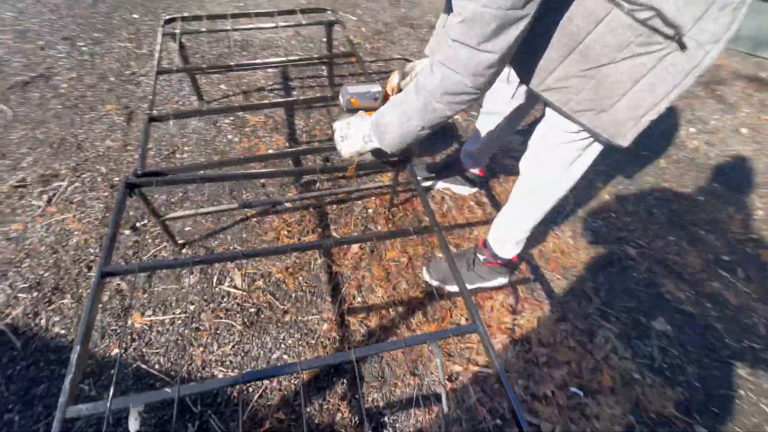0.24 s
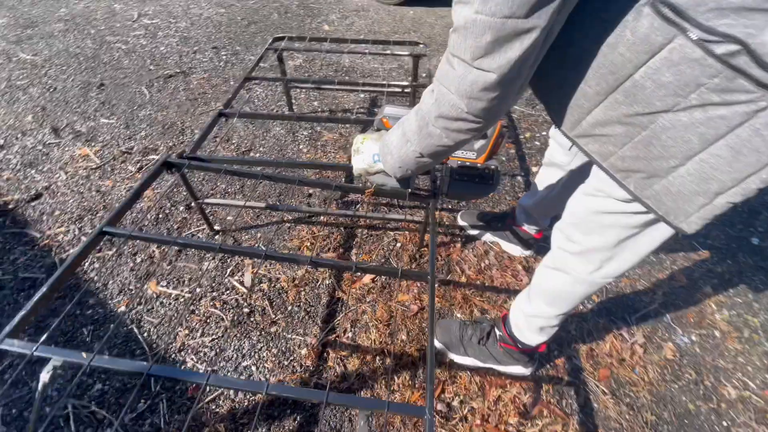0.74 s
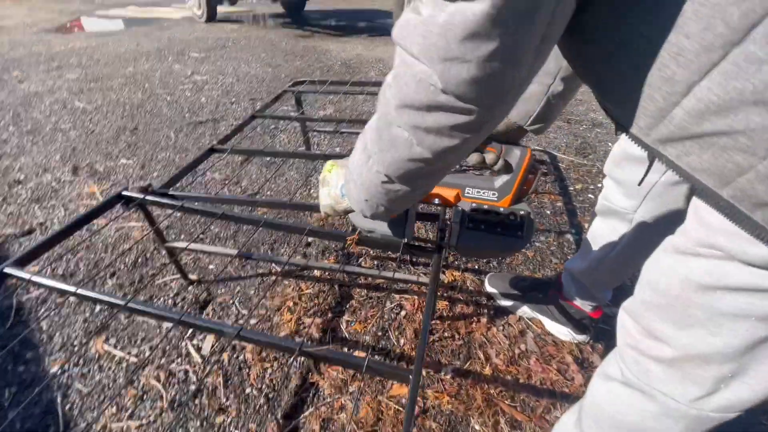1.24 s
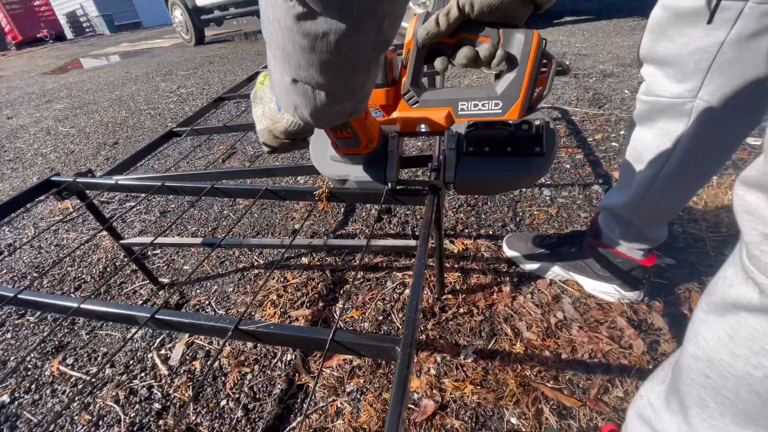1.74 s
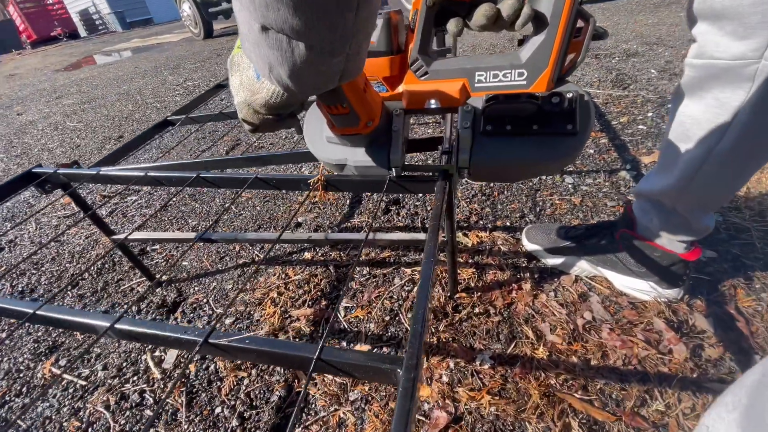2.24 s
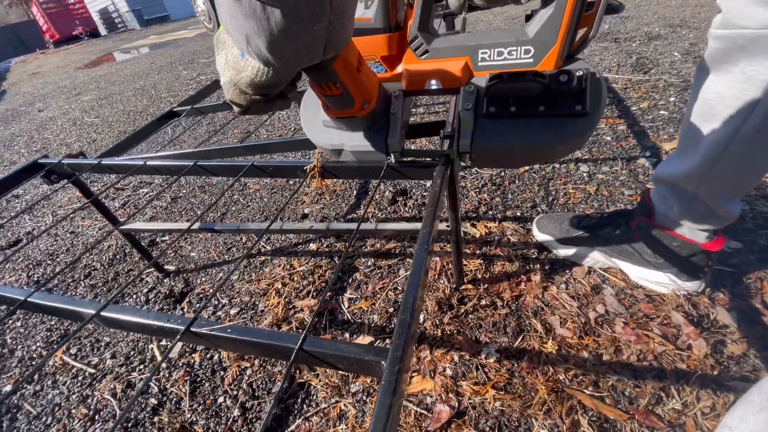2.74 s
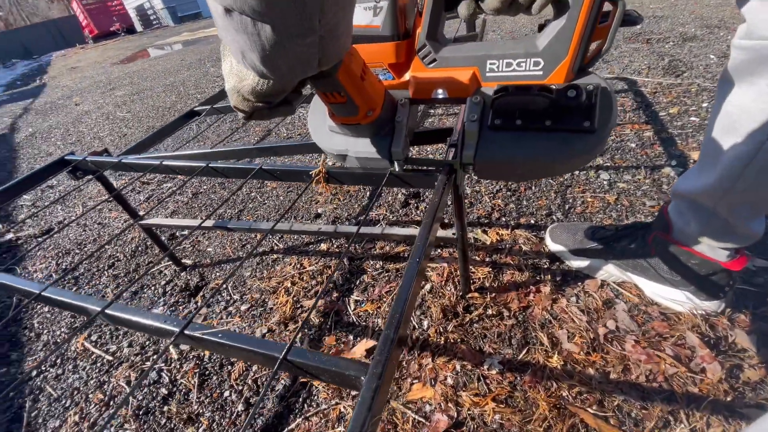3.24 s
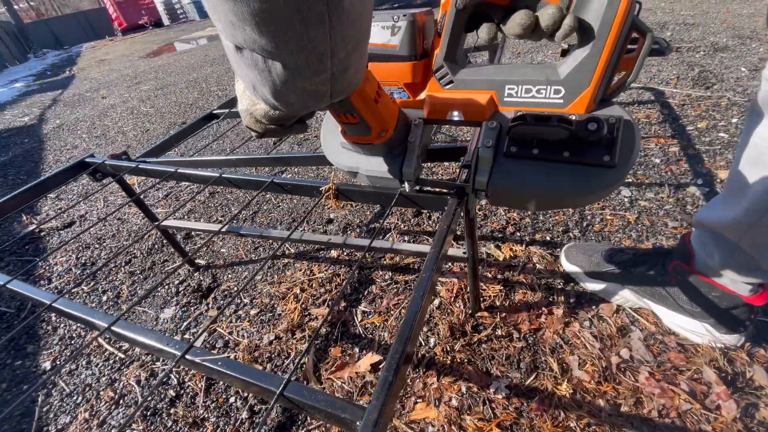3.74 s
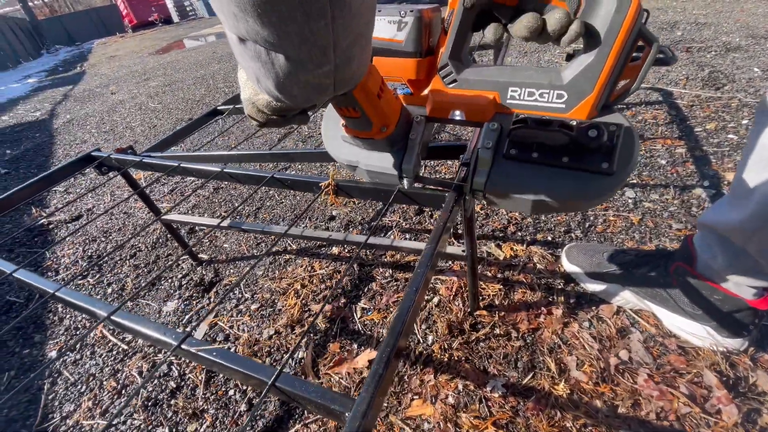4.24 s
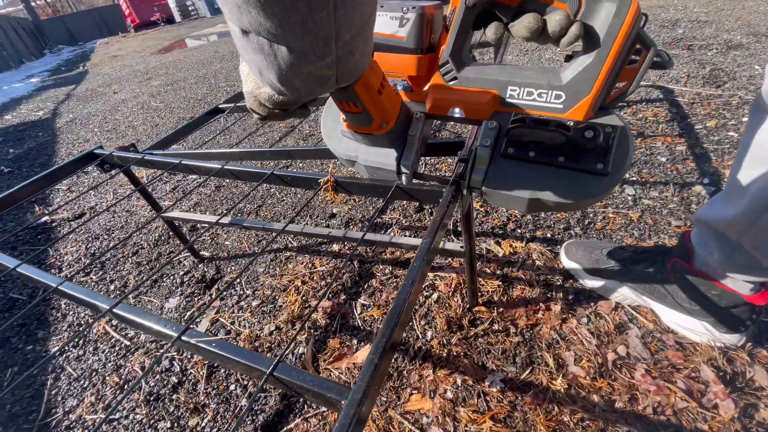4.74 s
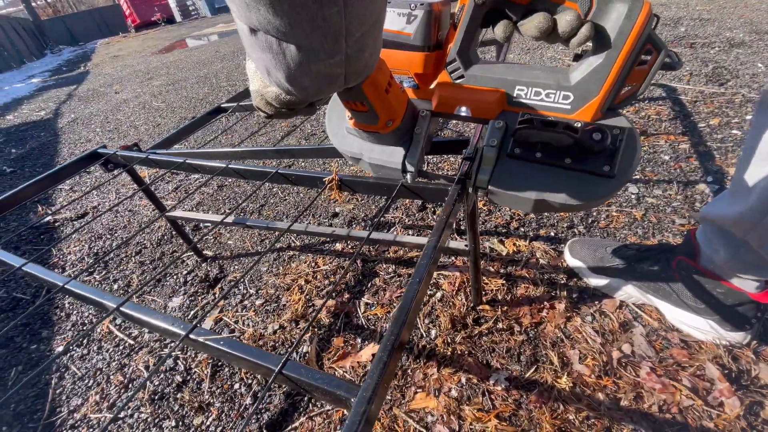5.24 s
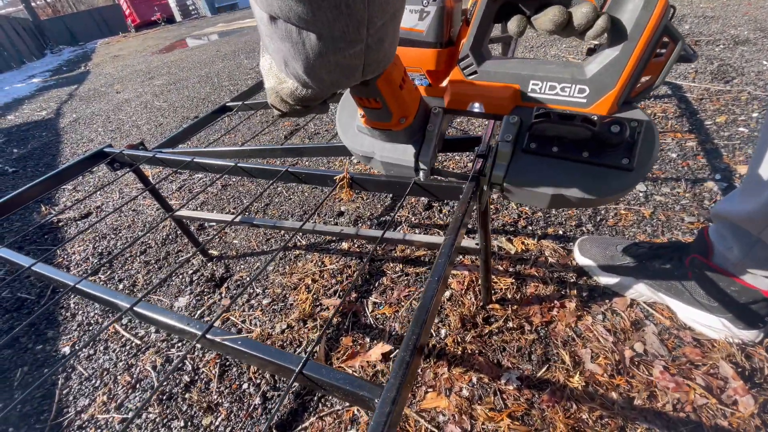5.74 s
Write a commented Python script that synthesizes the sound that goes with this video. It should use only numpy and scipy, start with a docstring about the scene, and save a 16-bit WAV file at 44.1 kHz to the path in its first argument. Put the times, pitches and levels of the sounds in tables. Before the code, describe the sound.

Outdoors on gravel, a handheld bandsaw cuts a steel bed rail. Wind buffets the microphone at first over rattling gears, a groan and piercing squeals. The cut thins after a second while a low motor tone swells, then the teeth bite hard into a bright, ringing hiss. A scrape pulses almost four times a second, and the cut weakens at the end.

```python
"""A cordless bandsaw cuts a steel bed rail on a gravel yard: noise and tones moulded by level curves.
First, wind noise buffets the microphone over gear rattle, chip noise, a groan and squeals as the blade binds.
The cut thins after about a second while the motor tone swells; just before two seconds the teeth bite hard.
Over 700 teeth a second ring rail and blade through filtered clicks, and the weld scrapes by once a lap.
Late on the cut thins again and wind returns briefly; the yard scatters all but the wind across the stereo."""
import sys
import numpy as np
from scipy import signal
from scipy.fft import rfft, irfft
from scipy.io import wavfile
from scipy.ndimage import uniform_filter1d

SR = 44100
rng = np.random.default_rng(int(sys.argv[2]) if len(sys.argv) > 2 else 0)


def output_pcm(signal):
    """Save a mono or channel-first signal as 16-bit PCM at the path in sys.argv[1].

    Samples are clipped to [-1, 1] before scaling.
    """
    pcm = np.clip(np.atleast_2d(signal).T, -1, 1) * 32767
    wavfile.write(sys.argv[1], SR, np.round(pcm).astype(np.int16))


N = 264849
T = np.arange(N) / SR
FREQS = np.maximum(np.arange(N // 2 + 1) * SR / N, 1)


def undb(db):
    """Decibels to gain."""
    return 10 ** (np.asarray(db) / 20)


def curve(rows):
    """An automation curve: breakpoints joined by straight lines in time."""
    return np.interp(T, *np.transpose(rows))


def colour(points):
    """EQ curve: gain at every frequency from (f/Hz, level/dB) points on a log frequency axis."""
    hz, db = np.transpose(points)
    return undb(np.interp(np.log(FREQS), np.log(hz), db))


def shape(x, gain):
    """Filter by a gain per frequency."""
    return irfft(rfft(x) * gain, N)


def unit(x, band=(0, SR)):
    """Scale so that the rms within a band (Hz) is 1."""
    in_band = (FREQS >= band[0]) & (FREQS < band[1])
    return x / np.std(shape(x, in_band))


def walk(rate):
    """Smooth random drift of spread 1 that changes about rate times a second."""
    coarse = rng.standard_normal(N // 4)
    for _ in range(2):
        coarse = uniform_filter1d(coarse, size=4)
    return np.interp(8 * rate * T, np.arange(len(coarse)), coarse) / np.std(coarse)


def grains(spread_db):
    """Dense tiny clicks of very unequal size."""
    return rng.standard_normal(N) * undb(spread_db * np.minimum(rng.exponential(size=N), 6))


def swell(centre_s, half_s):
    """A smooth rise and fall of height 1."""
    return np.exp(-.5 * ((T - centre_s) / half_s) ** 2)


def tooth_tone(phase, multiple, slip, flutter_db):
    """One multiple of a cycle at rms 1; uneven teeth shake its phase (slip, rad) and strength."""
    tone = np.sin(multiple * phase + slip * walk(61)) * undb(flutter_db * walk(45))
    return tone / np.std(tone)


# the weld passes through the cut once a lap: t/s, level/dB of its force
WELD_PASSES = [(0.385, -22), (0.668, -26), (0.941, -22), (1.215, -27), (1.482, -28), (1.737, -19),
               (2.001, -15.5), (2.273, -16), (2.552, -17), (2.82, -17), (3.092, -19.5), (3.359, -20.5),
               (3.626, -19), (3.895, -21), (4.171, -23), (4.443, -22), (4.728, -24.5), (4.995, -23.5),
               (5.269, -21), (5.541, -22.5), (5.815, -28.5)]


def weld_bumps(rise_s, fall_s, after_s=0):
    """Force swells and dies as the weld is dragged through the slot."""
    force = np.zeros(N)
    for at_s, db in WELD_PASSES:
        age = T - at_s - after_s
        near = np.abs(age) < .2
        spread_s = np.where(age[near] < 0, rise_s, fall_s)
        force[near] += undb(db) * np.exp(-.5 * (age[near] / spread_s) ** 2)
    return force


# blade speed as the saw comes up and settles, before braking and drift: t/s, tooth rate f/Hz
TOOTH_RATE = [(0, 642), (.24, 653), (.34, 675.3), (.39, 758), (.42, 695.3), (.54, 704.5), (.84, 738),
              (1.2, 742.8), (2.1, 728.2), (3.0, 721), (3.5, 730.5), (3.9, 716.7), (4.65, 714), (6, 734.7)]


def tooth_phase():
    """Tooth cycle in radians: the speed curve drifts a little, and the weld brakes the blade for a moment."""
    braking = .15 * weld_bumps(rise_s=.015, fall_s=.025)
    teeth_hz = curve(TOOTH_RATE) * (1 - braking + 0.001793 * walk(30))
    return 2 * np.pi * np.cumsum(teeth_hz) / SR


# wind automation, before the offset of each port: t/s, level/dB
WIND_LEVEL = [(0, -45.5), (.4, -36.5), (.48, -53.5), (.58, -35), (.68, -43), (1, -66.5), (3.7, -63),
              (5.5, -67), (5.57, -51.5), (5.72, -62)]


def wind():
    """Eddies rumble separately at each microphone port, more on the left."""
    tint = colour([(25, -24), (55, 0.5), (250, -10), (500, -13.5), (2000, -67)])
    ports = [unit(shape(rng.standard_normal(N) * undb(0.89 * walk(45)), tint)) for _ in range(2)]
    port_offset_db = np.array([[3.0], [-1.5]])  # left, right
    return np.array(ports) * undb(curve(WIND_LEVEL) + port_offset_db)


# running noise of gears and blade wheels, before the trim of each layer: t/s, level/dB
DRIVE_LEVEL = [(0, -30), (.41, -29.5), (.5, -40), (1.26, -39), (1.78, -34.5), (2.44, -40.5), (3.8, -42.5),
               (4.1, -47), (5, -50.5)]
# EQ of the gear rattle: f/Hz, level/dB
GEAR_COLOUR = [(30, -34), (280, -17), (480, -3.5), (750, 0), (1130, 8), (1400, 4), (1850, 6.5), (2600, 5.5),
               (3700, 7), (5400, 0.5), (6100, 1), (16000, -7)]
# EQ of the housing when knocked: f/Hz, level/dB
HOUSING_COLOUR = [(60, -30), (450, -17.5), (820, 10.5), (980, 2.5), (1150, 7.5), (1600, 0), (5000, 4.5),
                  (16000, -33)]


def machine(phase, frame):
    """Gears rattle, the blade ticks over its guides and the weld knocks the housing."""
    middle = (850, 1700)
    rattle = undb(1.35 * walk(130) + 1.0 * np.cos(phase / 2))
    gears = unit(shape(grains(2.2) * rattle, frame * colour(GEAR_COLOUR)), middle)
    guides = undb(0.6 * curve(DRIVE_LEVEL) - 31) * tooth_tone(phase, 1, slip=0.71, flutter_db=6.0)
    knock = unit(shape(grains(2.4) * rattle, frame * colour(HOUSING_COLOUR)), middle)
    knock_db = -18.5  # relative to the force of the weld
    knocks = undb(knock_db) * weld_bumps(rise_s=0.012, fall_s=0.012) * knock
    return undb(curve(DRIVE_LEVEL) - 2.1) * gears + guides + knocks


def frame_modes(ring_s, depth):
    """The many weak modes of the whole bed frame ripple the spectrum."""
    ripple = np.abs(rfft(rng.standard_normal(N) * np.exp(-T / ring_s))) ** depth
    return ripple / np.mean(ripple)


# how hard the saw is pressed into the rail, before ripple, skips and catches: t/s, level/dB
FEED_LEVEL = [(0, -28), (.42, -20), (.76, -23), (.88, -28.5), (1.15, -40), (1.58, -39.5), (1.85, -21.5),
              (2.15, -21.5), (2.4, -23.5), (2.9, -22.5), (3.2, -25.5), (3.85, -21), (4.3, -22.5),
              (4.5, -21), (4.8, -27), (5.35, -26), (5.7, -32.5), (6, -34)]
# the teeth catch (+) or ride out of the slot (-): t/s, half length/s, change of bite level/dB
BITE_CATCHES = [(1.036, 0.021, 11.5), (1.671, 0.023, 16), (1.8, 0.019, -13), (2.778, 0.042, -20.5),
                (2.119, 0.012, 1.5), (2.19, 0.0076, -3), (2.654, 0.0089, 1.5), (2.902, .022, 5),
                (3.446, 0.033, -12), (3.578, .03, 5), (3.712, 0.034, -2.5), (5.359, 0.015, 0.5),
                (5.989, 0.017, 5)]


def tooth_bite():
    """The bite follows the feed, ripples with the wavy blade, skips after the weld, and catches or slips."""
    passes = [at_s for at_s, _ in WELD_PASSES]
    lap = np.interp(T, passes, np.arange(len(passes)))
    waves_per_lap, wave_db, wave_lead_rad = 5, 0.09, 0.1
    ripple = wave_db * np.cos(2 * np.pi * waves_per_lap * lap + wave_lead_rad)
    # the weld lifts the teeth, which skip just after it has passed
    skip_db, skip_after_s, skip_half_s = -9, 0.048, 0.011  # depth at the strongest pass
    lift = weld_bumps(skip_half_s, skip_half_s, skip_after_s)
    skips = skip_db * lift / lift.max()
    catches = sum(db * swell(at_s, half_s) for at_s, half_s, db in BITE_CATCHES)
    return undb(curve(FEED_LEVEL) + ripple + skips + catches + 1.26 * walk(24))


def tooth_strikes(phase, count=22):
    """The regular part of the cutting force: multiples of the tooth rate that flare and fade on their own."""
    force = np.zeros(N)
    shaken = phase + 0.075 * walk(80)
    for k in range(1, count + 1):
        force += np.sin(k * shaken + k * k) * undb(15.2 * np.tanh(walk(16)))
    return force / np.std(force)


# resonances of rail and blade: f/Hz, nominal width/Hz, relative level/dB
RAIL_MODES = [(2168, 136, -8.5), (2962, 104, -9), (3658, 240, -14), (4345, 196, -5), (5060, 430, -9.5),
              (5815, 104, -6.5), (6185, 180, -0.5), (6555, 150, 3.5), (6970, 230, 0.5), (8090, 99, 0.5),
              (8590, 155, 2.5), (13100, 500, -11)]
# broad hiss of torn chips under the resonances: f/Hz, relative level/dB
CHIP_HISS = [(170, -33.5), (300, -33.5), (700, -22), (1200, -28), (2500, -14.5), (5450, -65), (7500, -9),
             (9800, -8.5), (11200, -9.5), (16000, -13)]


def chips(phase, bite, frame):
    """Each tooth strikes and tears a burst of chips, which ring rail and blade; the weld scrapes more broadly."""
    # power per frequency
    ringing = sum(undb(2 * db) / (1 + (2 * (FREQS - hz) / width) ** 2) ** 1.176
                  for hz, width, db in RAIL_MODES)
    hiss = colour(CHIP_HISS) ** 2
    tearing = undb(2.7 * np.cos(phase) + 1.6 * walk(90) + 0.46 * walk(700))
    treble = (5000, 16000)
    cut = unit(shape(grains(1.32) * tearing, frame * np.sqrt(ringing + hiss)), treble)
    song = unit(shape(tooth_strikes(phase), np.sqrt(ringing + undb(-8.0) * hiss)), treble)
    scrape_colour = frame * np.sqrt(ringing + undb(-2.5) * hiss)
    scrape = unit(shape(grains(0.76) * tearing, scrape_colour), treble)
    cutting = bite * (undb(-1.0) * cut + undb(-4.0) * song)
    return cutting + undb(1.5) * weld_bumps(rise_s=0.0095, fall_s=0.016) * scrape


def chatter(phase, bite):
    """The rail chatters on the third multiple of the tooth rate, growing faster than the bite."""
    chatter_db, full_bite_db, power = -34.5, -21, 1.25  # level at a full bite, that bite, steepness
    level = undb(chatter_db) * (bite / undb(full_bite_db)) ** power
    return level * tooth_tone(phase, multiple=3, slip=.45, flutter_db=2.2)


# the blade binds and a squeal locks on: t/s, half length/s, multiple of the tooth rate, level/dB
BINDING_SQUEALS = [(0.198, .15, 1, -38.5), (.12, 0.14, 3, -33), (0.259, 0.064, 6, -27.5),
                   (0.329, 0.012, 3, -21.5), (.33, 0.022, 6, -20.5), (.35, 0.1, 9, -24),
                   (0.392, 0.016, 3, -24), (.44, 0.014, 6, -12.5), (0.471, 0.054, 2, -35.5),
                   (.5, 0.042, 6, -18), (.52, 0.031, 4, -32), (0.499, 0.044, 3, -27),
                   (0.668, 0.063, 6, -28.5), (0.871, 0.056, 4, -32), (1.037, 0.028, 3, -29.5),
                   (1.196, 0.088, 6, -35.5), (2.096, 0.028, 3, -28), (2.24, 0.031, 6, -24),
                   (3.89, 0.018, 3, -22.5), (4.15, .035, 3, -29), (4.45, 0.029, 3, -28.5),
                   (4.68, 0.038, 3, -31)]


def squeals():
    """The blade binds, and each squeal holds a multiple of the tooth rate at its moment."""
    sound = np.zeros(N)
    for centre_s, half_s, multiple, db in BINDING_SQUEALS:
        locked_hz = multiple * np.interp(centre_s, *np.transpose(TOOTH_RATE))
        squeal = tooth_tone(2 * np.pi * locked_hz * T, 1, slip=.85, flutter_db=1.8)
        sound += undb(db) * swell(centre_s, half_s) * squeal
    return sound


def groan():
    """The bed frame groans on one unsteady tone as the saw first leans on it."""
    groan_hz, groan_db = 1122, -35.5
    tone = tooth_tone(2 * np.pi * groan_hz * T, 1, slip=1.3, flutter_db=3)
    return undb(groan_db) * swell(centre_s=0.13, half_s=0.17) * tone


def weld_ring():
    """The weld leaves one mode of the rail ringing just below the chatter."""
    ring_hz = 2025
    ring = tooth_tone(2 * np.pi * ring_hz * T, 1, slip=.6, flutter_db=2.0)
    return undb(-15.5) * weld_bumps(rise_s=.004, fall_s=0.033) * ring


# motor automation, before a small trim: t/s, level/dB
MOTOR_LEVEL = [(.8, -62), (1.5, -53), (2.4, -64), (3.3, -64), (4.2, -68)]


def motor(phase):
    """The motor hums at half the tooth rate, so it bends with the blade speed."""
    return undb(curve(MOTOR_LEVEL) + 0.5) * tooth_tone(phase / 2, 1, slip=0.047, flutter_db=1.7)


# stereo picture: f/Hz, side minus mid level/dB, left minus right level/dB
STEREO_PORTS = [(350, -8, -2.5), (720, -6, -1.5), (1170, -2, 0), (2770, 1.5, 1.5), (6150, 1, 3),
                (8640, -1, 1), (9920, 10, 2.4), (14760, -23.5, -1)]


def yard(direct, diffuse, scatter_s, diffuse_share):
    """Gravel and bed frame scatter short reflections and diffuse rasp that differ between the two ports."""
    hz, side_db, pan_db = np.transpose(STEREO_PORTS)
    echoes = rfft(rng.standard_normal(N) * np.exp(-T / scatter_s))
    scatter = echoes / np.abs(echoes)  # phase only
    width, pan = colour(np.c_[hz, side_db]), colour(np.c_[hz, pan_db / 2])
    reflections = np.sqrt(1 - diffuse_share) * shape(direct, width * scatter)
    rasp = np.sqrt(diffuse_share) * shape(diffuse, width)
    side = reflections + rasp
    even = 1 / np.sqrt(1 + width ** 2)  # keeps mid plus side power steady
    return np.array([shape(direct + side, even * pan), shape(direct - side, even / pan)])


def scene():
    """One blade speed drives teeth, chips and motor; the yard spreads them and wind goes on top."""
    phase = tooth_phase()
    bite = tooth_bite()
    frame = frame_modes(ring_s=0.015, depth=0.76)
    direct, diffuse = (chips(phase, bite, frame) + machine(phase, frame) for _ in range(2))
    singing = chatter(phase, bite) + squeals() + groan() + weld_ring()
    saw = direct + singing + motor(phase)
    return yard(saw, diffuse, scatter_s=0.011, diffuse_share=.42) + wind()


def record(dry):
    """The phone microphone thins the deepest rumble, rounds the highest peaks and cuts the top."""
    low_cut_hz, top_hz, ceiling = 45, 15700, 1.2
    thinned = signal.sosfilt(signal.butter(4, low_cut_hz, "high", fs=SR, output="sos"), dry)
    rounded = ceiling * np.tanh(thinned / ceiling)
    return signal.sosfilt(signal.ellip(10, .2, 80, top_hz, fs=SR, output="sos"), rounded)


dry = scene()
out = record(dry)
output_pcm(out)
```